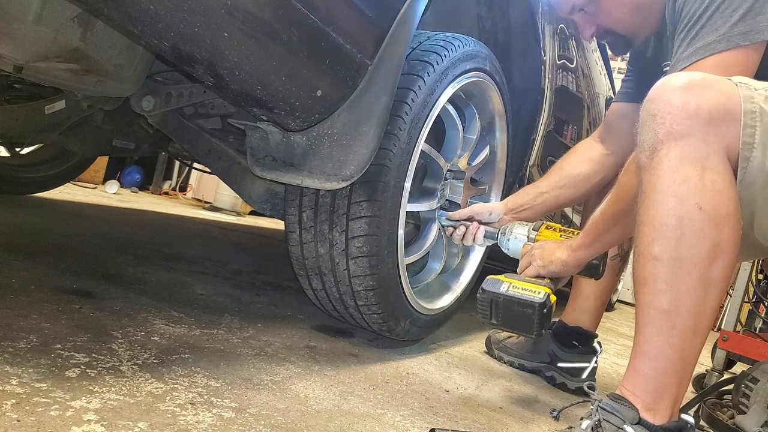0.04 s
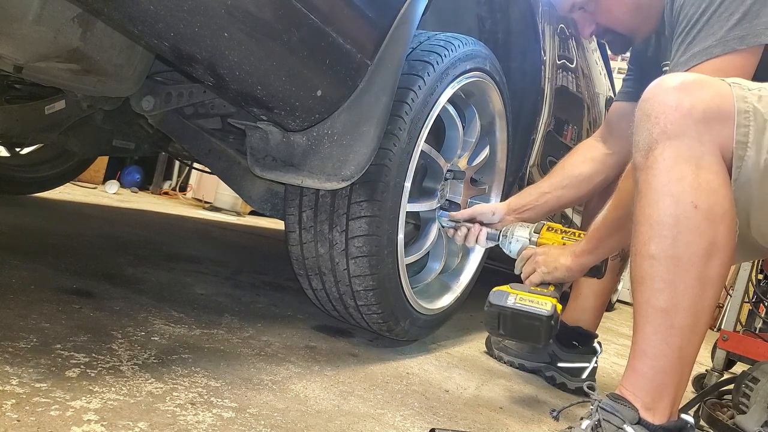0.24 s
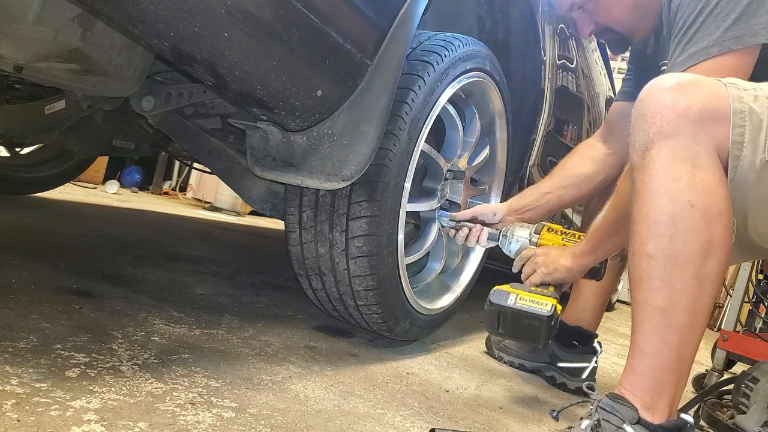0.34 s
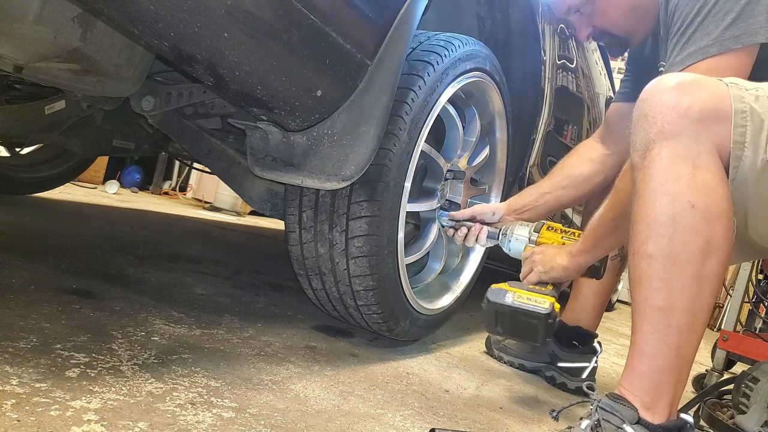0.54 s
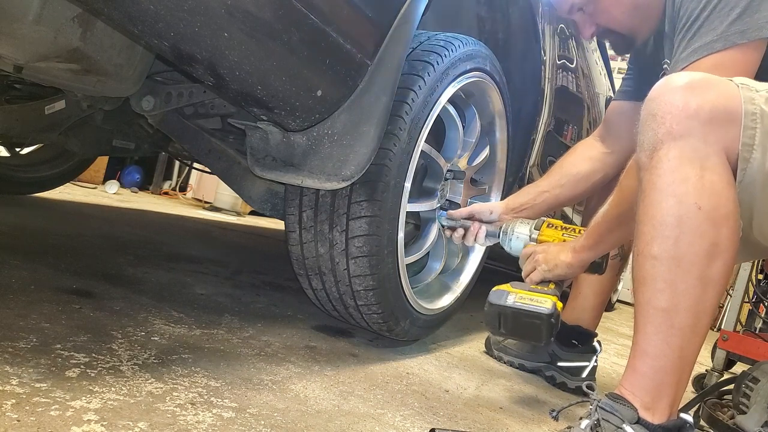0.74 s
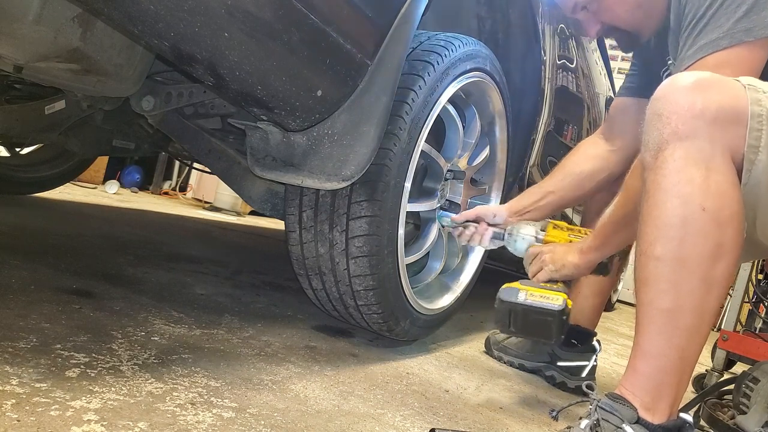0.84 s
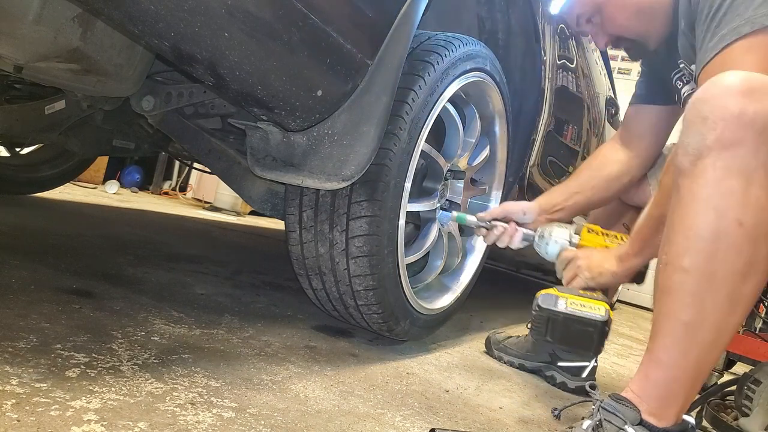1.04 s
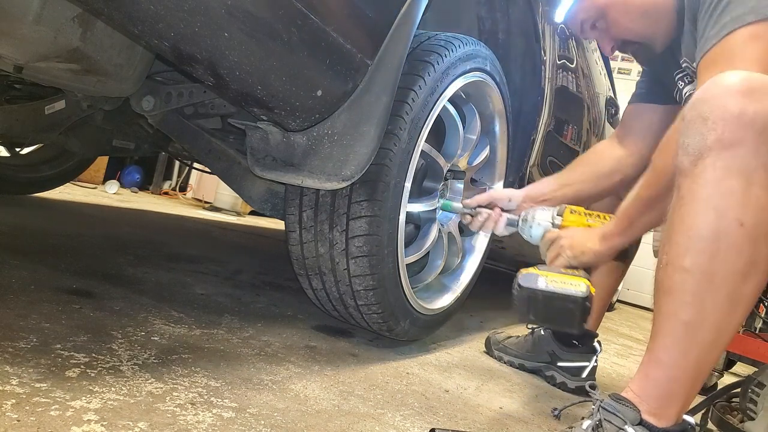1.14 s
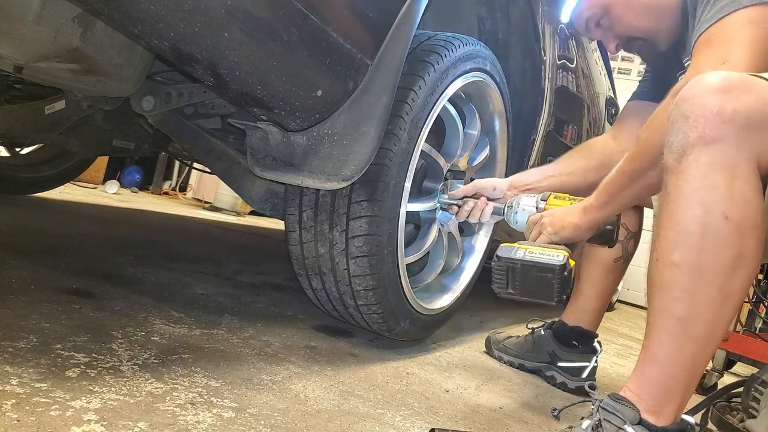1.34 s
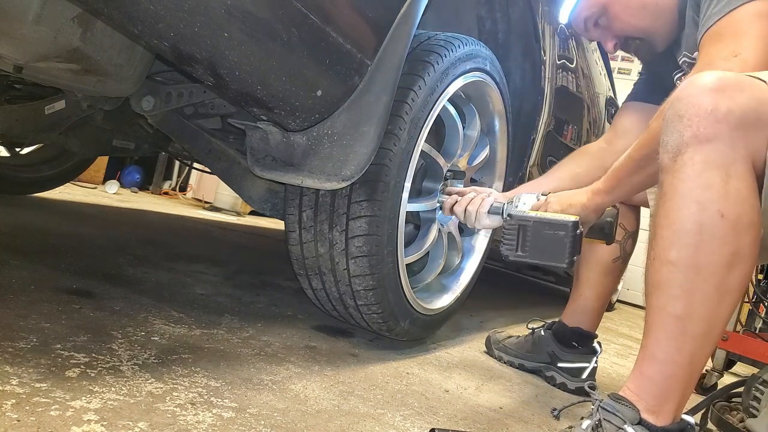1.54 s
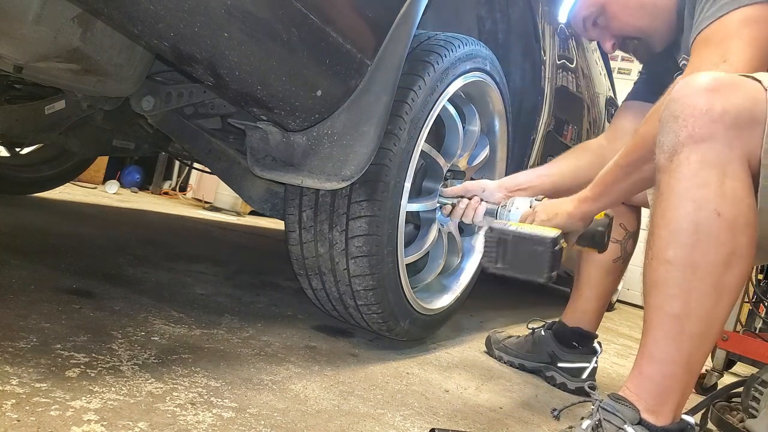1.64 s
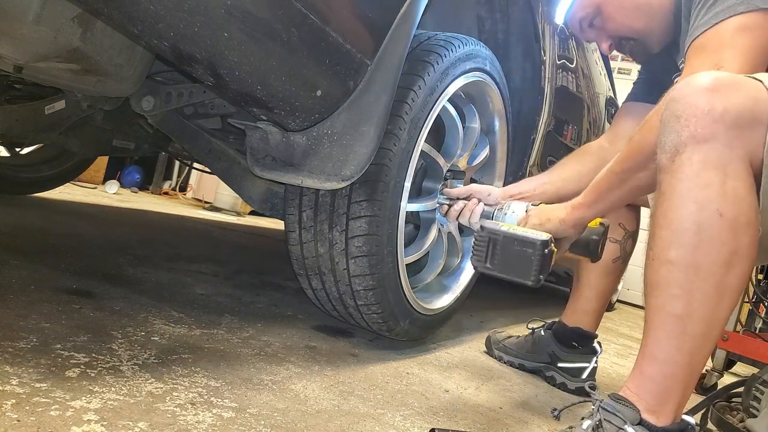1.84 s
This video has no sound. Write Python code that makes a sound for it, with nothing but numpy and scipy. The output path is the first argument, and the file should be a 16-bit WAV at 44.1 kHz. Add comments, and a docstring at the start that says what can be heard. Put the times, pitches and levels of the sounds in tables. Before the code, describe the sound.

A cordless impact wrench whirrs up and hammers a wheel bolt in two harsh, rattling bursts, ticks as it coasts down, then the socket softly knocks onto the next bolt; close microphone, small garage.

```python
"""A motor and its gears whirr, then a cordless impact wrench hammers a wheel bolt tight in two bursts.
It is close by in a small garage. Each blow is a short burst of noise plus the ringing of the alloy wheel.
The whirr is random clicks given a tone colour, with rough whistles and a hum; the car body rumbles and booms.
A few ticks follow as the tool coasts down; then the socket scrapes off, squeaks and knocks onto the next bolt."""
import sys
import numpy as np
from scipy import signal
from scipy.fft import rfft, irfft
from scipy.io import wavfile
from scipy.ndimage import uniform_filter1d

SR = 44100
rng = np.random.default_rng(int(sys.argv[2]) if len(sys.argv) > 2 else 0)


def dump_mix(stems):
    """Bounce the given channels to the path in sys.argv[1] as a 16-bit WAV at rate SR."""
    frames = np.atleast_2d(stems).T  # one column per channel
    limited = np.clip(frames, -1, 1)  # hard clip at full scale
    pcm = np.round(limited * 32767).astype(np.int16)
    wavfile.write(sys.argv[1], SR, pcm)


N = 83790
TIME = np.arange(N) / SR  # seconds


# hammer blows: (time [s], level [dB], treble tilt [dB per octave], socket clank against the blow [dB])
HAMMER_BLOWS = [(0.2113, -0.5, 4, 7), (.217, -2.5, 2.5, -3), (.225, -4, 1.5, 5), (0.2632, 0, 16, -11),
                (.2886, -2, 1.5, -5.5), (0.319, -5, 1, -10), (0.3285, -7, 3.5, 0.5), (0.3638, -5, 1, -4),
                (.376, -3, 6, -9.5), (0.395, -13, 6.5, -12.5), (0.6216, -19, -2, 8),
                (0.6419, -2, 2.5, -11.5), (0.6731, -1, 4, -2.5), (.683, -1, -1.5, -11.5), (.710, -8, 0, 6),
                (0.7229, -0.5, 12.5, -14.5), (.7615, 0, 3.5, -10.5), (.808, -7, 12, -10),
                (0.8371, -4, 0, -17), (0.8774, -0.5, 0.5, -19), (0.9267, -3, 1.5, -9),
                (0.9638, -9, 4.5, -33)]
# light ticks of the hammer: (time [s], level [dB], treble tilt [dB per octave])
HAMMER_TICKS = [(.5825, -44, 1.5), (0.9982, -20.5, -1), (1.048, -31.5, -9.5), (1.073, -30, -3.5),
                (1.098, -32, -3), (1.1335, -32, -5.5), (1.1561, -33, -4)]
# clunks as the bolt takes up torque: (time [s], level [dB])
BOLT_CLUNKS = [(.198, -29), (.233, -23), (.29, -36.5), (.642, -25.5), (.692, -23)]


def hammer():
    """Each blow cracks, clanks the socket and rings the wheel; the bolt clunks, then rings shrill when tight."""
    out = tight_bolt()
    for s, db, tilt_db, clank_db in HAMMER_BLOWS:
        add(out, s, crack(db, tilt_db))
        add(out, s, socket_clank(db + clank_db))
        add(out, s, wheel_ring(db))
    for s, db, tilt_db in HAMMER_TICKS:
        add(out, s, crack(db, tilt_db))
    for s, db in BOLT_CLUNKS:
        add(out, s, bolt_clunk(db))
    return out


# tone colour of hammer on anvil: (frequency [Hz], relative level [dB])
CRACK_COLOUR = [(100, -27), (400, -5.5), (1300, -7), (2000, 0), (2900, 3.5), (4500, -2.5), (7500, -6.5),
                (10000, -5), (13000, -7.5), (16000, -17)]


def crack(db, tilt_db):
    """Hammer hits anvil: noise that rises at once, holds for a moment and dies within milliseconds."""
    return amp(db - 8) * burst(CRACK_COLOUR, 0.00048, 0.0017, tilt_db, hold_s=0.0018)


# tone colour of the struck socket: (frequency [Hz], relative level [dB])
CLANK_COLOUR = [(200, -35), (1400, -26), (2200, -5.5), (2850, 4.5), (3400, -7.5), (4500, -18),
                (8000, -37.5)]


def socket_clank(db):
    """The blow shakes the socket, which clanks briefly, strongest near 3 kHz."""
    return amp(db - 9) * burst(CLANK_COLOUR, rise_s=.0018, decay_s=.0022)


# ringing tones of the alloy wheel: (frequency [Hz], level [dB], time to fall by 60 dB [s])
WHEEL_MODES = [(715, -4, 0.25), (923, -6.5, 0.38), (1877, -3.5, .2), (2050, -7.5, .25), (2297, -7.5, .2),
               (2300, -9, 0.34), (2700, -13.5, .2), (2840, -15, 0.26), (2813, 7.5, .2), (3120, -12.5, .2),
               (3046, 3, 0.32), (3750, -3.5, .18), (4540, -6.5, 0.15)]


def wheel_ring(db):
    """The wheel rings at its own pitches, with different starting phases at each ear."""
    return amp(db - 39.5) * np.array([ring(WHEEL_MODES), ring(WHEEL_MODES)])


# tone colour of the loaded bolt: (frequency [Hz], relative level [dB])
CLUNK_COLOUR = [(60, -15), (200, -12), (330, 7), (700, -2), (1200, -3.5), (2500, -20), (8000, -51)]


def bolt_clunk(db):
    """The bolt takes up torque with a dull burst of noise."""
    return amp(db) * burst(CLUNK_COLOUR, rise_s=0.0029, decay_s=0.031)


# shrill ringing once the bolt is tight: (time [s], level [dB])
TIGHT_LEVEL = [(.77, -50.5), (.81, -29.5), (.88, -25.5), (.94, -48), (.98, -55.5)]


def tight_bolt():
    """The tight bolt rings as a rough whistle at one pitch."""
    return fuzzy_tone(hz=5280, width_hz=260) * level(TIGHT_LEVEL)


def motor():
    """The tool's drive: gear rattle, low hum and motor whine together."""
    return gear_rattle() + motor_hum() + motor_whine()


CLICKS_PER_S, CLICK_SPREAD_DB, FLUTTER_DB = 4953, 3.5, 1.3
SEATED_S, SEATING_S = 0.67, 0.078  # middle and pace of the change in tone, in seconds
# gear colour before and after the bolt is seated: (frequency [Hz], relative level [dB])
LOOSE_COLOUR = [(60, -10), (150, 5), (230, -12), (600, -3.5), (1300, -6.5), (2000, 3), (3000, 2.5),
                (4200, 1.5), (5500, -4.5), (7500, -9), (10000, -8), (13000, -8), (16000, -11)]
SEATED_COLOUR = [(60, -8.5), (150, -2.5), (230, -18.5), (600, -8.5), (1300, -6.5), (2000, -2), (3000, -3.5),
                 (4200, 0.5), (5500, -1.5), (7500, -10.5), (10000, -5.5), (13000, -5.5), (16000, -6.5)]
# whirr of motor and gears: (time [s], level [dB])
DRIVE_LEVEL = [(0, -35), (.02, -45.5), (.05, -46.5), (.11, -35.5), (.17, -33.5), (.205, -27), (.235, -20),
               (.30, -18.5), (.35, -21.5), (.40, -19.5), (.445, -38), (.48, -72), (.58, -69), (.62, -48),
               (.65, -20.5), (.75, -18), (.80, -20), (.86, -21), (.9, -32.5), (.925, -31), (.955, -27.5),
               (.99, -47), (1.05, -49), (1.16, -52), (1.21, -75)]


def gear_rattle():
    """Gear teeth and the loose socket click at random, and sound thinner once the bolt is seated."""
    hits = (rng.random((2, N)) < CLICKS_PER_S / SR) * rng.choice([-1, 1], (2, N))
    uneven = amp(CLICK_SPREAD_DB * np.minimum(rng.exponential(1, N), 4))
    flutter = amp(FLUTTER_DB * unit(uniform_filter1d(rng.standard_normal(N), size=160)))
    clicks = hits * uneven * flutter
    seated = .5 + .5 * np.tanh((TIME - SEATED_S) / SEATING_S)
    rattle = (1 - seated) * colour(clicks, LOOSE_COLOUR) + seated * colour(clicks, SEATED_COLOUR)
    return rattle * level(DRIVE_LEVEL)


# tone colour of the motor's low hum: (frequency [Hz], relative level [dB])
HUM_COLOUR = [(40, -20.5), (100, 6), (160, -0.5), (260, -2), (500, -4), (900, -11), (1400, -7),
              (4000, -41.5)]
# its loudness: (time [s], level [dB])
MOTOR_HUM_LEVEL = [(0, -44.5), (.07, -51.5), (.12, -46), (.2, -43.5), (.42, -37), (.5, -56), (.56, -64),
                   (.6, -55.5), (.66, -53), (.95, -40), (1.1, -67), (1.22, -77)]


def motor_hum():
    """The motor's low hum is noise, strongest around 100 Hz."""
    return noise(HUM_COLOUR) * level(MOTOR_HUM_LEVEL)


# whine of the free-running motor, one list for each run-up: (time [s], pitch [Hz], level [dB])
RUN_UPS = [
    [(0, 3403, -45.5), (.06, 3400, -48), (.11, 3497, -35.5), (.145, 3480, -38.5), (.18, 2868, -38.5),
     (.21, 2755, -37), (.25, 2620, -59)],
    [(.575, 3400, -70.5), (.6, 3510, -48), (.63, 3480, -47.5), (.67, 2984, -64)],
]


def motor_whine():
    """Before each burst the free-running motor whines, a rough whistle that follows a moving pitch."""
    out = np.zeros((2, N))
    for run_up in RUN_UPS:
        s, hz, db = np.transpose(run_up)
        whistle = fuzzy_tone(np.interp(TIME, s, hz), width_hz=230)
        out += whistle * level(np.transpose([s, db]))
    return out


# socket knocks: (time [s], level [dB], treble tilt [dB per octave], decay [s], rattle against the knock [dB])
SOCKET_KNOCKS = [(1.275, -61.5, 3, 0.0046, -27.5), (1.346, -73.5, -13, 0.018, 2),
                 (1.377, -44.5, 5, 0.014, -25), (1.386, -38, -0.5, 0.012, -28),
                 (1.5445, -57, 1, 0.0053, -10), (1.612, -67, -3, 0.0075, -18.5),
                 (1.676, -57.5, 0.5, 0.0051, -19.5), (1.687, -50.5, 1, 0.0064, -7),
                 (1.801, -44.5, -3, 0.0096, -11)]
# thuds of the socket against the hub: (time [s], level [dB])
HUB_THUDS = [(1.386, -43), (1.806, -48)]
# squeaks of the socket on the bolt head: (time [s], pitch [Hz], level [dB])
BOLT_SQUEAKS = [(1.523, 1740, -62), (1.544, 1790, -54.5), (1.687, 1700, -55.5)]


def socket():
    """The socket scrapes off one bolt, squeaks, and knocks and rattles onto the next."""
    out = np.zeros((2, N))
    for s, db, tilt_db, decay_s, rattle_db in SOCKET_KNOCKS:
        add(out, s, knock(db, tilt_db, decay_s))
        add(out, s, hub_ring(db))
        add(out, s, socket_rattle(db + rattle_db, tilt_db))
    for s, db in HUB_THUDS:
        add(out, s, hub_thud(db))
    for s, hz, db in BOLT_SQUEAKS:
        add(out, s, squeak(hz, db))
    return out


# tone colour of socket on bolt: (frequency [Hz], relative level [dB])
KNOCK_COLOUR = [(100, -11), (230, -5.5), (370, 8), (620, 1), (900, -2), (1400, -4.5), (1900, -0.5),
                (4000, 0), (7500, -15.5), (13000, -21.5), (16000, -20)]


def knock(db, tilt_db, decay_s):
    """The socket hits metal: a sharp start and a quick decay."""
    return amp(db) * burst(KNOCK_COLOUR, 0.00074, decay_s, tilt_db)


def socket_rattle(db, tilt_db):
    """After a knock the socket rattles: a slower burst whose loudness jumps about."""
    rattle = burst(KNOCK_COLOUR, 0.0081, 0.035, tilt_db)
    wander = unit(uniform_filter1d(rng.standard_normal(rattle.shape[1]), size=180))
    chatter = unit(amp(3.6 * wander))
    return amp(db) * rattle * chatter


# dull tones of hub and brake: (frequency [Hz], level [dB], time to fall by 60 dB [s])
HUB_MODES = [(370, -0.5, 0.11), (521, -9.5, 0.12), (612.7, 2, 0.11)]


def hub_ring(db):
    """Knocks of the socket set hub and brake ringing dully."""
    return amp(db - 14) * ring(HUB_MODES, rise_s=.004)


# tone colour of socket against hub: (frequency [Hz], relative level [dB])
THUD_COLOUR = [(80, -14), (220, -13), (370, 6), (480, -14), (620, -3), (850, 0), (1300, -28), (4000, -45)]


def hub_thud(db):
    """The socket lands on the hub with a short, dull burst of noise."""
    return amp(db) * burst(THUD_COLOUR, rise_s=0.0035, decay_s=.01)


SQUEAK_S, PITCH_FALL, OVERTONE_DB = .012, 0.055, -7  # the pitch falls by this fraction
ROUGHNESS = .085  # random phase step at each sample, in radians


def squeak(hz, db):
    """The socket rubs the bolt head: a short, rough tone and its octave, falling in pitch."""
    u = np.arange(0, 1, 1 / (SQUEAK_S * SR))
    pitch = hz * (1 - PITCH_FALL * (u - .5))
    turn = 2 * np.pi * np.cumsum(pitch) / SR + ROUGHNESS * np.cumsum(rng.standard_normal(len(u)))
    swell = np.sin(np.pi * np.sqrt(u))
    return amp(db) * swell * (np.sin(turn) + amp(OVERTONE_DB) * np.sin(2 * turn))


# tone colour of the low rumble: (frequency [Hz], relative level [dB])
RUMBLE_COLOUR = [(20, -27), (35, -18), (58, 5.5), (85, 0), (130, -11), (200, -15.5), (350, -24),
                 (1000, -51.5), (4000, -69.5)]
# its loudness: (time [s], level [dB])
BODY_RUMBLE_LEVEL = [(0, -46.5), (.15, -47.5), (.5, -48), (1.0, -56.5), (1.2, -58), (1.34, -65.5),
                     (1.45, -55.5), (1.62, -62.5), (1.76, -52.5), (1.9, -52.5)]
# jolts of wheel and car body: (time [s], level [dB])
BODY_JOLTS = [(0, -43), (.085, -40.5), (.19, -28.5), (.235, -31), (0.289, -28), (0.646, -34), (0.691, -31),
              (.77, -38.5), (0.848, -39.5), (0.931, -37), (1.392, -48.5), (1.688, -49.5), (1.801, -42.5)]
# booming tones of the car body: (frequency [Hz], level [dB], time to fall by 60 dB [s])
BODY_MODES = [(62.6, -4.5, 0.2), (80.1, 1, 0.32), (130.3, -5, .25), (151.9, -6.5, 0.44)]


def car_body():
    """Tyre and panels rumble as low noise, and boom at their own pitches when the wheel is jolted."""
    out = noise(RUMBLE_COLOUR) * amp(np.interp(TIME, *np.transpose(BODY_RUMBLE_LEVEL)))
    for s, db in BODY_JOLTS:
        add(out, s, amp(db) * ring(BODY_MODES, rise_s=0.017))
    return out


# time for the tail to fall by 60 dB: (frequency [Hz], time [s])
TAIL_T60 = [(60, 0.17), (300, 0.22), (1000, 0.28), (3000, 0.28), (8000, 0.28), (16000, 0.23)]


def garage(x, tail_db):
    """Direct sound, early echoes off floor and car, and a tail that is shared by both ears in the bass."""
    t = TIME[:SR // 2]
    taps = rng.choice([-1., 1.], (2, len(t))) * (rng.random((2, len(t))) < 3000 / SR) * (t > .001)
    hz, at, z = signal.stft(taps, SR, nperseg=256)
    same = 1 / (1 + (hz[:, None] / 600) ** 2)  # near 1 in the bass: both ears alike
    z = np.array([z[0], same * z[0] + np.sqrt(1 - same ** 2) * z[1]])
    fade = np.exp(-np.log(1000) * at / read(TAIL_T60, hz)[:, None])
    tail = signal.istft(z * fade, SR, nperseg=256)[1][:, :len(t)]
    early = rng.standard_normal(taps.shape) * (rng.random(taps.shape) < 2500 / SR) * np.exp(-t / .014)
    early = signal.lfilter(*signal.butter(2, 420, "high", fs=SR), early)
    echo = amp(tail_db) * equal_energy(tail) + amp(-3.5) * equal_energy(early)
    return amp(-3.5) * (x + signal.fftconvolve(x, echo, axes=1)[:, :N])


# tone colour of the quiet background: (frequency [Hz], relative level [dB])
BACKGROUND_COLOUR = [(50, 5), (300, 4), (800, 0.5), (2000, -2), (5000, -10.5), (9000, -14.5),
                     (16000, -17.5)]


def background():
    """A faint steady noise lies under everything."""
    return amp(-81.5) * noise(BACKGROUND_COLOUR)


def burst(points, rise_s, decay_s, tilt_db=0, hold_s=0):
    """A struck part's dense, quickly dying vibration."""
    t = TIME[:SR // 4]
    grain = rng.choice([-1., 1.], (2, len(t)))
    rise = np.minimum(t / rise_s, 1)
    fall = np.exp(-np.maximum(t - rise_s - hold_s, 0) / decay_s)
    return colour(grain, points, tilt_db) * rise * fall


def ring(modes, rise_s=0.0013):
    """A struck part's own tones, each starting at a random phase and dying away at its own rate."""
    t = TIME[:SR // 2]
    tones = np.zeros(len(t))
    for hz, db, t60 in modes:
        fall = np.exp(-np.log(1000) * t / t60)
        tones += amp(db) * fall * np.sin(2 * np.pi * (hz * t + rng.random()))
    return np.minimum(t / rise_s, 1) * tones


def fuzzy_tone(hz, width_hz):
    """A rough whistle that follows a pitch: slow random wavering shifted up to that pitch."""
    r = np.exp(-2 * np.pi * width_hz / SR)
    grain = rng.standard_normal((2, N)) + 1j * rng.standard_normal((2, N))
    waver = signal.lfilter([1], np.poly([r, r]), grain)  # two equal low-pass stages
    carrier = np.exp(2j * np.pi * np.cumsum(hz * np.ones(N)) / SR)
    return unit((waver * carrier).real)


def noise(points):
    """Steady noise with a given tone colour."""
    return colour(rng.standard_normal((2, N)), points)


def colour(x, points, tilt_db=0):
    """Gives a pair of signals a spectrum, tilted in the treble and alike at both ears in the bass; rms 1."""
    hz, z = np.fft.rfftfreq(x.shape[1], 1 / SR), rfft(x)
    apart = np.pi / 4 * hz / np.hypot(hz, 700)  # the ears differ more and more around 700 Hz
    shared, split = np.cos(apart) * z[0], np.sin(apart) * z[1]
    z = np.array([shared + split, shared - split])
    shape_db = read(points, hz) + tilt_db * np.log2(1 + hz / 3000)
    return unit(irfft(z * amp(shape_db), x.shape[1]))


def level(points):
    """Gain over time from a table of (time [s], level [dB]); silent outside it."""
    s, db = np.transpose(points)
    return amp(np.interp(TIME, s, db)) * (TIME <= s[-1]) * (TIME >= s[0])


def read(points, hz):
    """Reads a table on a log-frequency axis."""
    f, value = np.transpose(points)
    return np.interp(np.log(hz + 1), np.log(f), value)


def amp(db):
    """Decibels to gain."""
    return 10 ** (np.asarray(db) / 20)


def unit(x):
    """Scales to rms 1."""
    return x / np.sqrt(np.mean(x ** 2) + 1e-20)


def equal_energy(h):
    """Scales each ear's echoes to a total energy of 1."""
    return h / np.linalg.norm(h, axis=1, keepdims=True)


def add(mix, s, sound):
    """Mixes a sound in at time s."""
    part = mix[:, max(round(s * SR), 0):][:, :sound.shape[-1]]
    part += sound[..., :part.shape[1]]


def scene():
    """Tool and wheel in the quiet garage, slightly louder on the right."""
    heard = garage(hammer() + motor(), tail_db=-5) + garage(socket(), tail_db=-3.5)
    left_right_db = [[-0.85], [0.35]]
    return heard * amp(left_right_db) + car_body() + background()


def record(dry):
    """The microphone drops the lowest bass and overloads softly; then the highest treble is cut."""
    low_cut = signal.butter(3, 36, "high", fs=SR, output="sos")
    heard = np.tanh(signal.sosfilt(low_cut, dry))
    treble_cut = signal.firwin(511, 15950, window=("kaiser", 9), fs=SR)
    return signal.oaconvolve(heard, treble_cut[None], "same")


dry = scene()
out = record(dry)
dump_mix(out)
```